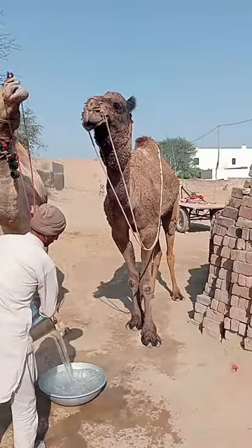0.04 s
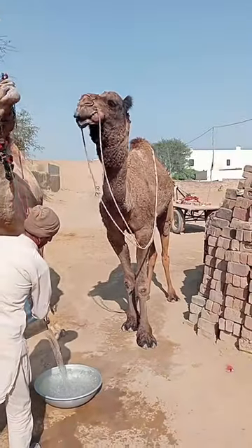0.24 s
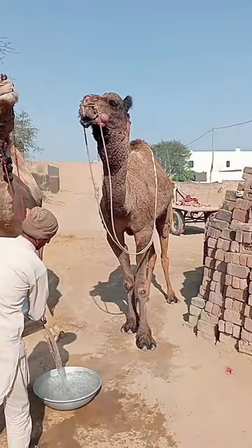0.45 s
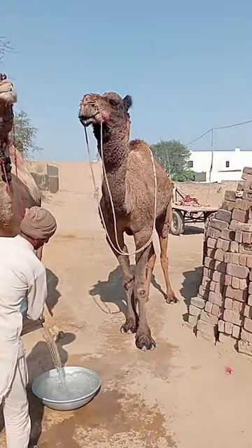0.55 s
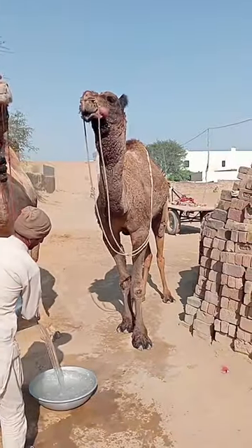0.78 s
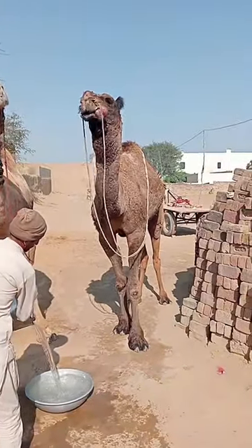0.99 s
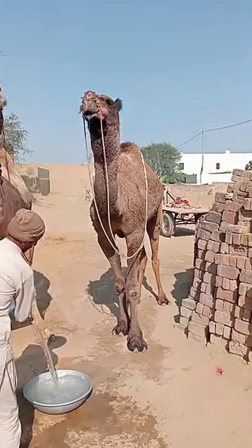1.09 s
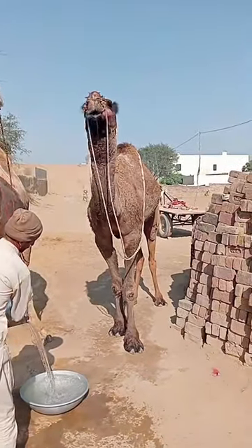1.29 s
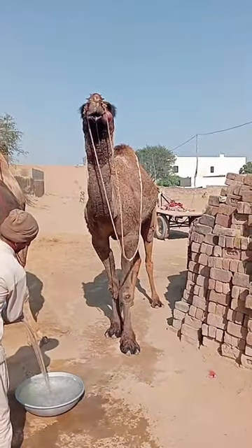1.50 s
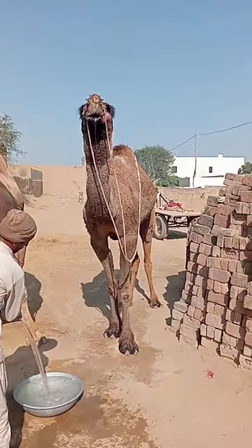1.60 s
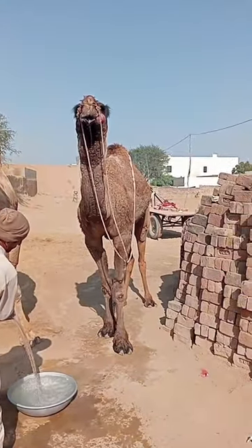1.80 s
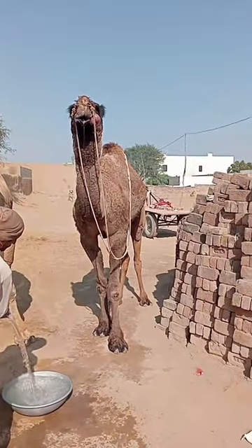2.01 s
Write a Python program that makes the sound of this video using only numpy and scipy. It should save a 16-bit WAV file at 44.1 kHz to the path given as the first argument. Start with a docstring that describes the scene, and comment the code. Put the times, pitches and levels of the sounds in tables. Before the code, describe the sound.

Water pours into a metal basin outdoors, starting suddenly at about 0.2 seconds. Low glugs from the pot come in quick runs that rise in pitch, strongest until about 0.7 seconds, mixed with sharp splashes and bubbly plops. From about 1 second the glugs weaken and the stream patters and fizzes more softly over a faint hollow hum, continuing to the end at around 2 seconds.

```python
"""Pouring water into a basin

Water is tipped from a narrow-necked pot into a metal basin in an open yard. Air gulps back into
the pot in runs of low glugs that climb in pitch and weaken as the flow evens out. The stream
patters and fizzes in the basin, where slugs of water splash, bubbles plop and ping, and a hollow
note keeps coming back. Underneath, the air in the pot and basin drones softly."""
import sys
import numpy as np
from scipy import signal
from scipy.io import wavfile

SR = 44100
rng = np.random.default_rng(int(sys.argv[2]) if len(sys.argv) > 2 else 0)


def int16_out(signal):
    """Quantize to a 16-bit WAV file."""
    q = np.round(np.clip(np.atleast_2d(signal).T, -1, 1) * 32767)
    wavfile.write(sys.argv[1], SR, q.astype(np.int16))


N = 90404
T = np.arange(N) / SR


def from_db(db):
    """Turn decibels into a number to multiply by."""
    return 10 ** (np.asarray(db) / 20)


def unit_level(x):
    """Scale a sound so that its average (RMS) level is 1."""
    return x / np.sqrt(np.mean(x ** 2) + 1e-20)


def curves(rows):
    """Join timed rows with straight lines, giving one curve for each column of values."""
    times, *columns = np.transpose(rows)
    return [np.interp(T, times, column) for column in columns]


def band(x, low_hz, high_hz, order=2):
    """Keep the part of a sound between two pitches."""
    sos = signal.butter(order, [low_hz, min(high_hz, SR / 2 - 1)], "band", fs=SR, output="sos")
    return signal.sosfilt(sos, x + 1e-18)


def noise(low_hz, high_hz):
    """Noise between two pitches, at level 1."""
    return unit_level(band(rng.standard_normal(N), low_hz, high_hz))


def drift(rate_hz):
    """A smooth random wobble, about 1 in size."""
    pole = np.exp(-2 * np.pi * rate_hz / SR)
    return unit_level(signal.lfilter([1], [1, -2 * pole, pole * pole], rng.standard_normal(N + SR))[SR:])


def resonate(x, hz, width_hz):
    """Keep only what rings near one pitch."""
    return signal.lfilter(*signal.iirpeak(hz, hz / width_hz, fs=SR), x)


def coloured(x, resonances):
    """Make narrow ranges of pitch louder or softer."""
    for hz, width_hz, db in resonances:
        x = x + (from_db(db) - 1) * resonate(x, hz, width_hz)
    return x


def swell(start, attack_s, length_s, hold):
    """Fade in, hold for a share of the length, then die away (to about a third at the full length)."""
    age = np.maximum(T - start, 0)
    fade_in = np.sin(np.pi / 2 * np.minimum(age / attack_s, 1)) ** 2
    return fade_in * np.exp(-np.clip((age / length_s - hold) / (1 - hold), 0, 30))


def chirp(start, hz, rise_per_s, length_s, waver=0):
    """A rising tone that passes hz halfway along its length; the rise is a share of that pitch."""
    pitch = hz * (1 + rise_per_s * np.clip(T - start - length_s / 2, -length_s, 2 * length_s))
    return -np.sin(2 * np.pi * np.cumsum(pitch * (T >= start)) / SR + waver)


def rumble():
    """The faint, low rumble of the outdoors."""
    return from_db(-65) * noise(52, 140)


def yard_echo(x, fade_s=0.085):
    """The ground and a stack of bricks scatter the sound into a faint, short echo."""
    tail = rng.standard_normal(N) * from_db(-60 * T / fade_s) * (T > .003)
    echo = signal.fftconvolve(x, tail / np.sqrt(np.sum(tail ** 2)))[:N]
    return from_db(-11) * band(echo, 330, 6860, order=1)


# The low notes of the air in the pot and basin. Each row: pitch in Hz, width in Hz, relative level in dB.
DRONE_NOTES = [(161.4, 20, -5), (227.5, 21, 1), (325.4, 10.2, -6), (439.3, 15, -9)]
# How loud the drone is over time. Each row: time in seconds, level in dB.
DRONE_LEVELS = [(.21, -42), (.45, -41), (.7, -42), (1.0, -51.5), (1.5, -48.5), (2.05, -53)]


def air_drone():
    """Churning water keeps the air in the pot and basin humming."""
    level_db, = curves(DRONE_LEVELS)
    notes = sum(from_db(db) * unit_level(resonate(noise(hz / 2, hz * 2), hz, width_hz))
                for hz, width_hz, db in DRONE_NOTES)
    return from_db(level_db) * notes


def drop_bursts(per_s=340, spread_db=1.5, decay_s=0.0015):
    """Drops land at random, many small and a few large; each gives a quick jump in loudness."""
    lands = rng.random(N) < per_s / SR
    sizes = from_db(spread_db * np.minimum(rng.exponential(1, N), 3.2))
    return unit_level(signal.lfilter([1], [1, -np.exp(-1 / (decay_s * SR))], lands * sizes + 1e-18))


def tiny_bubbles(low_hz, high_hz, per_s, spread_db=3.5, ring_cycles=9.8, rise=0.0645):
    """Small bubbles form at random, each a dying tone that rises slightly."""
    out = np.zeros(N + SR)
    for when, place, chance in rng.random((600, 3))[:int(per_s * N / SR)]:
        hz = low_hz * (high_hz / low_hz) ** place
        age = np.arange(int(5 * ring_cycles * SR / hz)) * hz / SR / ring_cycles   # in decay times
        tone = np.sin(2 * np.pi * ring_cycles * age * (1 + rise * age / 2))
        gain = from_db(spread_db * min(-np.log(chance), 3.5))
        first = int(when * N)
        out[first:first + len(age)] += gain * np.exp(-age) * tone
    return unit_level(out[:N])


# The tone of the stream. Each row: pitch in Hz, relative strength in dB for each Hz of width.
STREAM_TONE = [(380, -2), (450, 13), (600, -1), (780, 3.5), (1100, -7.5), (1700, -3), (2400, -7),
               (3300, -9), (4700, -20), (7000, -18), (9500, -31), (15500, -39.5)]


def stream_slice(bursts, low_hz, high_hz, bubbles_per_s):
    """One narrow slice of the stream's pitches: pattering spray, fizzing bubbles and a smooth wash."""
    tone_hz, tone_db = np.transpose(STREAM_TONE)
    db = np.interp(np.log(low_hz * high_hz) / 2, np.log(tone_hz), tone_db)
    patter = unit_level(band(bursts * rng.standard_normal(N), low_hz, high_hz, order=3))
    fizz = unit_level(band(tiny_bubbles(low_hz, high_hz, bubbles_per_s), low_hz * 0.93, high_hz * 1.23))
    water = from_db(-4.5) * patter + from_db(-7) * fizz + from_db(-4) * noise(low_hz, high_hz)
    flicker_db = 2.0 * drift(rate_hz=29)
    return from_db(db + flicker_db) * np.sqrt(high_hz - low_hz) * water


# How loud the stream is. Each row: time in seconds, then its low, middle and high levels in dB.
STREAM_LEVELS = [(.21, -74, -42, -57), (0.329, -42.5, -43, -60), (0.441, -41.5, -47, -57.5),
                 (.48, -72, -44, -58.5), (.54, -40.5, -44.5, -56.5), (.61, -45.5, -42, -58.5),
                 (.68, -40, -43.5, -54.5), (.9, -47, -45, -58), (1.021, -48, -52.5, -61.5),
                 (1.14, -46, -47.5, -59.5), (1.20, -49, -48, -59.5), (1.25, -58.5, -50, -54.5),
                 (1.36, -49.5, -51.5, -59), (1.44, -52.5, -48.5, -56), (1.63, -52.5, -48.5, -58.5),
                 (1.70, -57, -51.5, -56.5), (1.82, -50.5, -49.5, -57), (1.87, -44, -47.5, -57),
                 (1.97, -49.5, -49.5, -55.5), (2.05, -47, -50, -58.5)]
# The pitches at which the basin rings. Each row: pitch in Hz, width in Hz, boost in dB.
BASIN_RINGS = [(1375, 137, 6.5), (1680, 62, 6), (1940, 264, 5), (2305, 160, 6), (2918, 30, 9),
               (3936, 263, 6.5)]


def stream(slices=7, bubbles_per_range_per_s=1000):
    """The stream strikes the water, and the basin around it boosts a few pitches."""
    bursts = drop_bursts()
    ranges_hz = [(380, 1200), (1200, 4000), (4000, 16000)]   # low, middle, high
    out = np.zeros(N)
    for level_db, (low_hz, high_hz) in zip(curves(STREAM_LEVELS), ranges_hz):
        edges = np.geomspace(low_hz, high_hz, slices + 1)
        water = sum(stream_slice(bursts, bottom, top, bubbles_per_range_per_s / slices)
                    for bottom, top in zip(edges, edges[1:]))
        out += from_db(level_db) * unit_level(coloured(water, BASIN_RINGS))
    surge_db = 0.69 * drift(rate_hz=23.5)   # the whole stream wobbles
    return out * from_db(surge_db)


# Pockets of air closing. Each row: start in seconds, first pitch in Hz, last pitch in Hz,
# level in dB, length in seconds.
AIR_POCKETS = [(0.335, 1058, 1463, -42, 0.074), (0.351, 2600, 3324, -48.5, 0.041),
               (0.442, 1630, 1720, -40, 0.019), (1.042, 1235, 2245, -53, 0.1),
               (1.238, 2103, 2130, -49, 0.082)]


def air_pockets(width_share=0.099, fade_s=0.0035):
    """A shrinking pocket of air gives a rough ring that slides upward."""
    out = np.zeros(N)
    for start, from_hz, to_hz, db, length in AIR_POCKETS:
        pitch = np.interp(T, [start, start + length], [from_hz, to_hz])
        phase = 2 * np.pi * np.cumsum(pitch) / SR
        fade = np.clip(np.minimum(T - start, start + length - T) / fade_s + .5, 0, 1)
        width_hz = width_share * from_hz
        ringing = drift(width_hz) * np.sin(phase) + drift(width_hz) * np.cos(phase)
        out += from_db(db) * fade * ringing
    return out


def slap_ring(x, hz, width_octaves=0.95):
    """A slap rings around one pitch, falling off gently below it and steeply above."""
    half_width = 2 ** (width_octaves / 2)
    steep_top = signal.butter(6, hz * half_width * 0.79, fs=SR, output="sos")
    return unit_level(signal.sosfilt(steep_top, band(x, hz / half_width, hz * half_width)))


# The biggest splashes. Each row: start in seconds, relative level in dB, pitch in Hz, length in seconds.
WATER_SLAPS = [(0.2186, -27.5, 2460, 0.0036), (.219, -30.5, 1080, 0.026), (0.243, -40, 3050, 0.017),
               (0.247, -29, 950, 0.0086), (0.29, -27.5, 860, 0.011), (0.324, -23.5, 1130, 0.0065),
               (0.377, -24.5, 976, 0.014), (0.417, -33, 764, 0.048), (0.639, -37, 1510, 0.03),
               (0.677, -32.5, 1760, 0.011), (0.706, -25.5, 1960, 0.0054), (0.78, -27, 2270, 0.0046),
               (0.821, -34.5, 1700, 0.013), (0.872, -34.5, 1330, 0.0044), (0.909, -28, 2340, 0.0029),
               (0.98, -33, 830, 0.0076), (1.134, -38, 1530, 0.0071), (1.463, -38, 4100, 0.0037),
               (1.784, -37, 4240, 0.005), (1.785, -42, 1630, 0.011), (1.851, -39, 1510, 0.0075),
               (1.971, -39, 1880, 0.0065)]


def splashes(attack_s=0.001027, gain_db=-2.5):
    """A slug of water slaps the surface with a crack and a short shower of spray."""
    out = np.zeros(N)
    for start, db, hz, length in WATER_SLAPS:
        shape = swell(start, attack_s, length, hold=0.063)
        shower = slap_ring(shape * rng.standard_normal(N), hz)
        crack = slap_ring(signal.unit_impulse(N, int((start + attack_s) * SR)), hz)
        out += from_db(db + gain_db) * unit_level(shower + crack) * np.sqrt(np.mean(shape ** 2))
    return out


# Short ringing tones: a recurring hollow note near 440 Hz, plus bubble plops and pings.
# Each row: start in seconds, pitch in Hz, level in dB, length in seconds.
SHORT_RINGS = [(0.2206, 3240, -30, 0.003), (0.246, 2710, -34, 0.0091), (0.245, 3530, -35.5, 0.0025),
               (0.25, 3200, -25, 0.0022), (0.29, 1443, -34, 0.021), (0.316, 807, -22.5, 0.0075),
               (0.34, 4910, -46.5, 0.0041), (0.379, 960, -49, 0.0067), (0.404, 7950, -66, .012),
               (0.421, 430, -20.5, 0.005), (0.435, 5310, -50, 0.01), (0.523, 1360, -37, 0.021),
               (.640, 458.4, -40, 0.04), (0.673, 440, -25.5, 0.0095), (.812, 438.7, -40.5, 0.064),
               (0.855, 785, -32.5, 0.012), (.922, 436, -38.5, 0.023), (.986, 484, -40, 0.022),
               (1.04, 474, -40.5, 0.032), (1.136, 2930, -42.5, 0.0053), (1.199, 657, -41.5, 0.015),
               (1.28, 436, -41, 0.029), (1.407, 419, -36.5, 0.018), (1.518, 447, -40.5, 0.024),
               (1.579, 451, -38.5, 0.017), (1.784, 425, -35.5, 0.017), (1.849, 637, -31.5, 0.005),
               (1.926, 2270, -42, 0.0093), (1.968, 723, -37.5, 0.0086)]


def short_rings(attack_cycles=1.75, rise_per_s=2.1):
    """The hollow note or a bubble swells within two vibrations, rings briefly and rises in pitch."""
    out = np.zeros(N)
    for start, hz, db, length in SHORT_RINGS:
        shape = swell(start, attack_cycles / hz, length, hold=0.63)
        out += from_db(db) * shape * chirp(start, hz, rise_per_s, length)
    return out


# Air gulping into the pot.
# Each row: start in seconds, pitch in Hz, relative level in dB, length in seconds.
AIR_GULPS = [(0.216, 168, -13.5, 0.021), (.241, 197, -14.5, 0.025), (0.267, 228.3, -19.5, 0.031),
             (0.284, 226, -16.5, 0.022), (0.315, 230.4, -11, 0.028), (0.347, 300.6, -15, 0.017),
             (0.366, 257, -20, 0.02), (0.424, 210.5, -17, .016), (0.432, 314.2, -23.5, 0.026),
             (0.464, 195, -21, 0.015), (.489, 185, -19.5, 0.024), (0.517, 196, -16.5, 0.031),
             (0.552, 221.5, -18, 0.027), (0.579, 227, -14, 0.027), (0.613, 249.7, -28, 0.059),
             (0.643, 273, -26, 0.014), (.757, 196.3, -30, 0.024), (.789, 183, -27, 0.027),
             (0.849, 203.4, -26, 0.037), (0.898, 230.3, -25, 0.043), (0.941, 252.2, -23, 0.043),
             (0.991, 291.5, -36.5, 0.058), (1.035, 222, -31, 0.025), (1.066, 228.4, -28, 0.031),
             (1.133, 203, -37, 0.023), (1.298, 239, -24.5, 0.025), (1.328, 261, -27, 0.037),
             (1.387, 274, -32.5, 0.035), (1.434, 332, -31.5, 0.023), (1.515, 237.7, -27.5, 0.03),
             (1.581, 236, -34, 0.0087), (1.607, 260.4, -33.5, 0.047), (1.717, 255, -35, 0.026),
             (1.755, 264.7, -26.5, 0.039)]


def glugs(attack_s=0.0059, rise_per_s=3.72, gain_db=-3):
    """Each gulp of air sets the hollow of the pot ringing, with a little low churning noise."""
    churn = from_db(-23.5) * noise(113, 340)
    waver = 0.36 * drift(rate_hz=44)   # churning water shakes each tone; in radians
    out = np.zeros(N)
    for start, hz, db, length in AIR_GULPS:
        shape = swell(start, attack_s, length, hold=0.51)
        tone = chirp(start, hz, rise_per_s, length, waver)
        out += from_db(db + gain_db) * shape * (tone + churn)
    return out


def scene():
    """The pour, its echo and the outdoor rumble, in one channel."""
    water = glugs() + short_rings() + splashes() + air_pockets() + stream() + air_drone()
    return (water + yard_echo(water) + rumble())[None]


# The microphone's uneven treble. Each row: pitch in Hz, width in Hz, boost or cut in dB.
TREBLE_COLOUR = [(8040, 320, 7.5), (8540, 2800, -11), (11000, 170, 7.5), (12800, 450, -25)]


def record(dry, start_s=0.209, low_cut_hz=53, high_cut_hz=15600):
    """Keep silent until the sound cuts in, colour the treble, and remove the deep bass and very top."""
    cut_in = np.clip((T - start_s) / 0.00071, 0, 1)
    out = coloured(dry * cut_in, TREBLE_COLOUR)
    out = signal.sosfilt(signal.butter(3, low_cut_hz, "high", fs=SR, output="sos"), out)
    return signal.sosfilt(signal.ellip(10, .2, 80, high_cut_hz, fs=SR, output="sos"), out)


dry = scene()
out = record(dry)
int16_out(out)
```